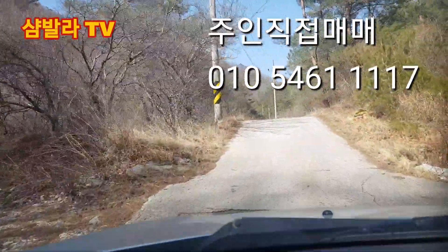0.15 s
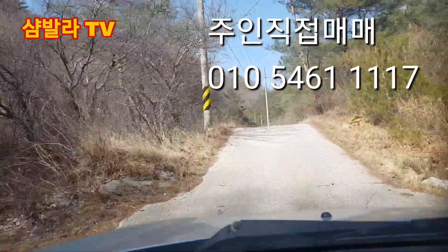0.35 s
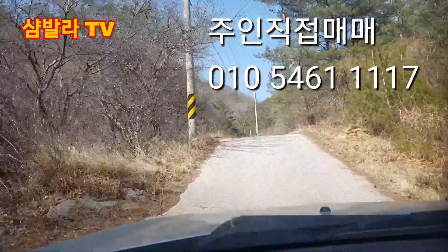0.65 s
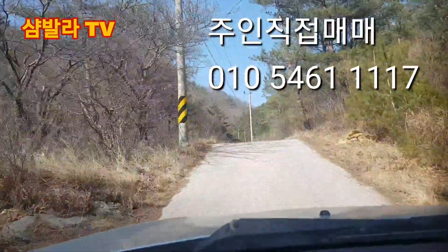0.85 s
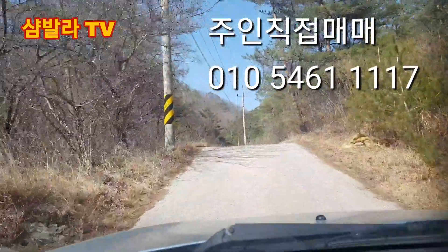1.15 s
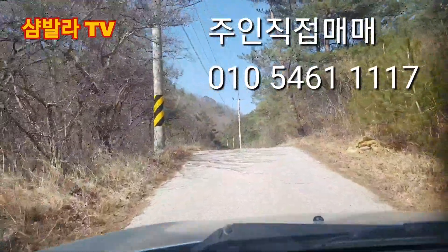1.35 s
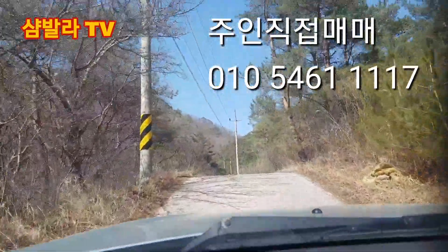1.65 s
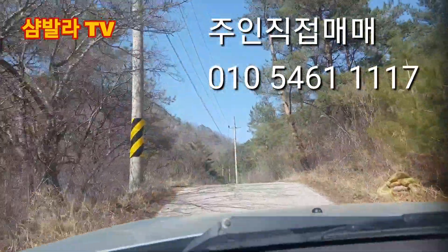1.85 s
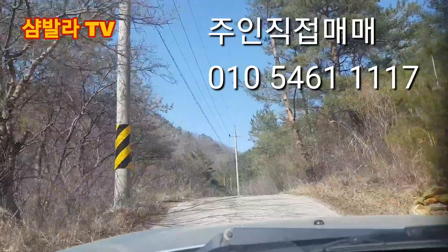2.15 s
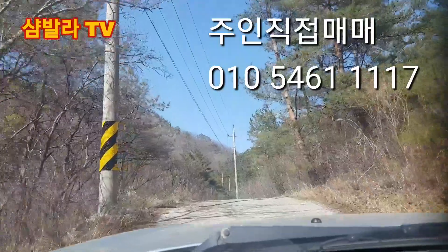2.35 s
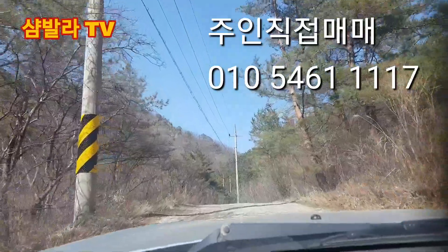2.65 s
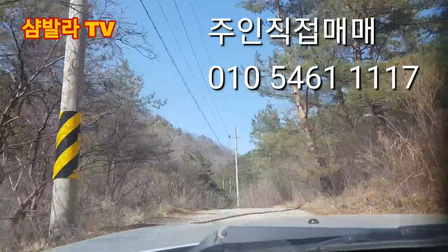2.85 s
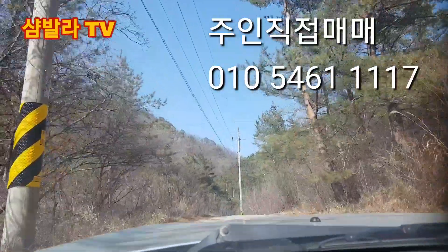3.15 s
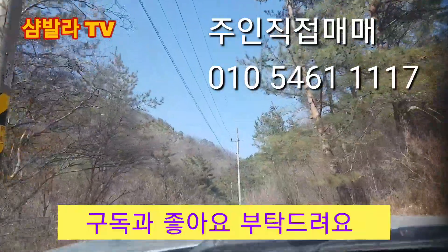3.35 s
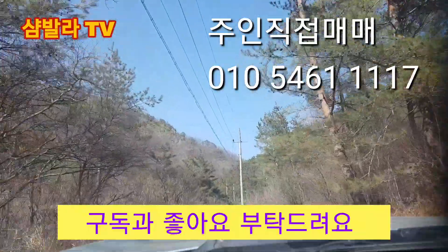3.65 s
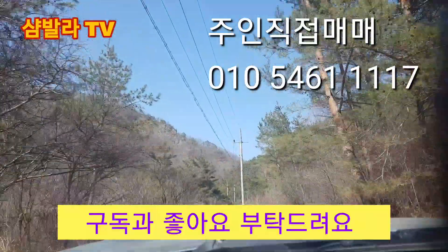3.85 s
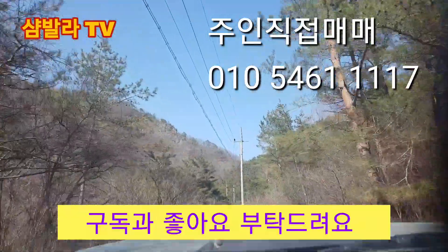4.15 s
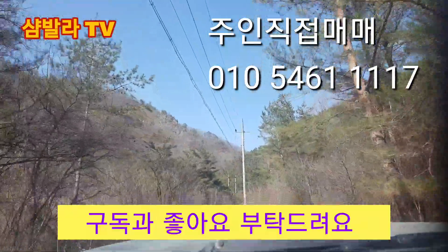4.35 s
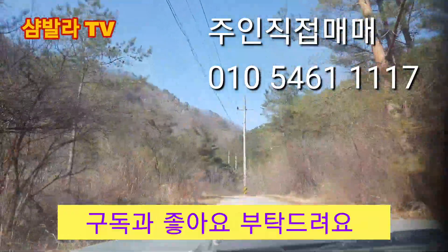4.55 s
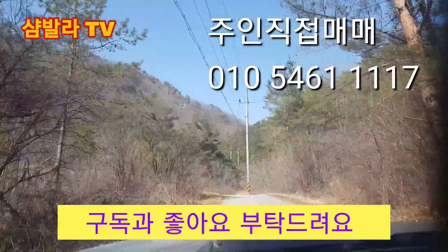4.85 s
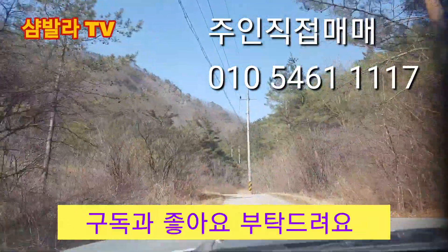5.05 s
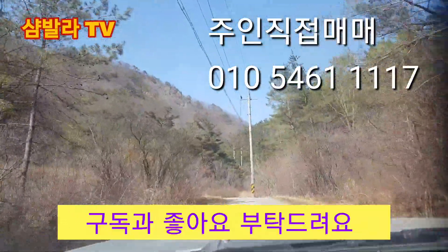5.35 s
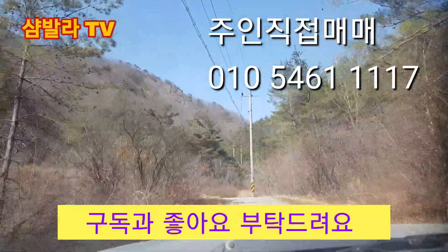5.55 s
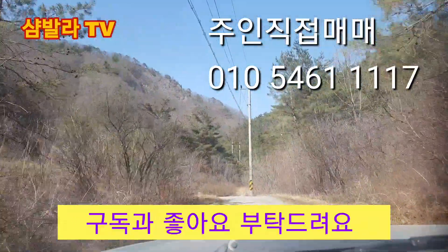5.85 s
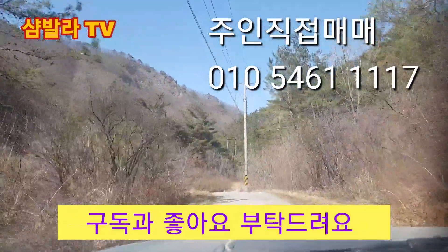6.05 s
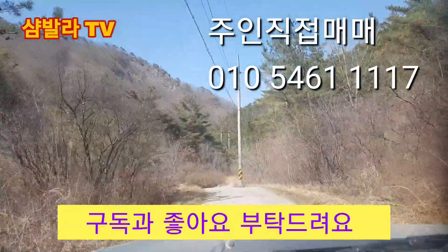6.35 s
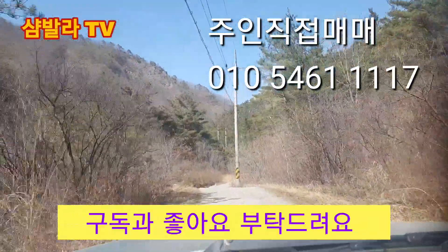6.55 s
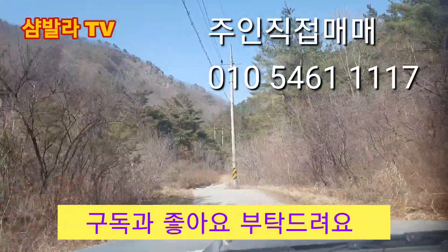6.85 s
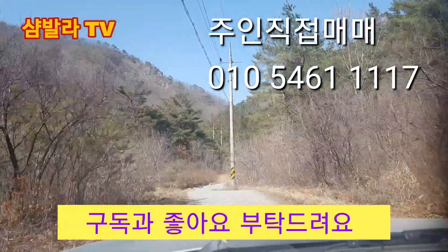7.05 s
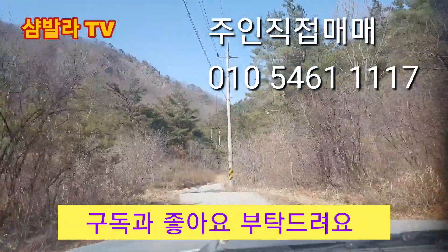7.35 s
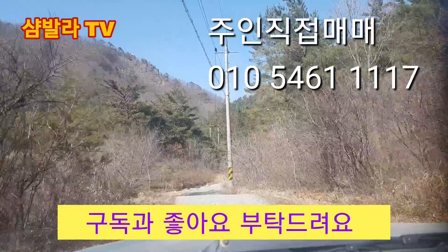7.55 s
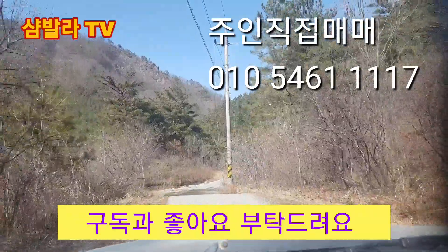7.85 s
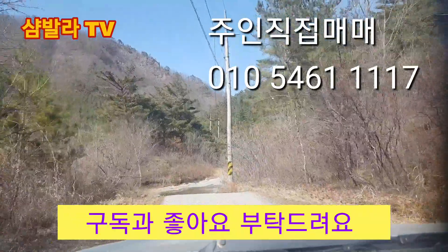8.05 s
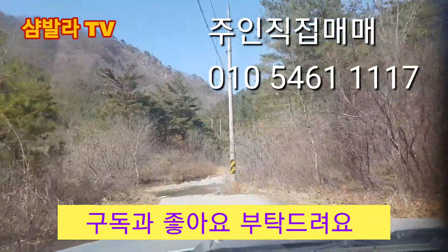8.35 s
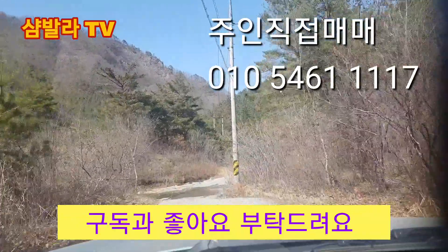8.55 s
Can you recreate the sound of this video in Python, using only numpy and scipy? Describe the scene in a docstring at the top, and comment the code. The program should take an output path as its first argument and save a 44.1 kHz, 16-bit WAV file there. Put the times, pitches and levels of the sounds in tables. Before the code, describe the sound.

Heard from a dashboard microphone inside a slowly moving car: a low engine drone and bassy tyre rumble run throughout. Early ruts boom while loose plastic chatters over fading hiss and crackling grit. A rubber bush groans briefly, the engine rises in pitch over a crest, then two heavy suspension thumps hit midway, followed by lighter knocks and continued rattling.

```python
"""A car creeps along a broken concrete lane, heard from the dashboard: an engine drone over rumbling tyres.
At first ruts boom in the cabin, a loose plastic fitting chatters, and a hiss and crackling grit soon fade.
A rubber bush groans once near 1.5 s; the engine then firms up over a crest, as its firing rate rises.
The hardest ruts thump near 4.6 s and again near 5.3 s; later come lighter knocks and more chatter.
The drone and ringing parts are sums of sine waves; the rumble, hiss, grit and cracks are shaped noise."""
import sys
import numpy as np
from scipy import signal
from scipy.fft import rfft, irfft, next_fast_len
from scipy.io import wavfile

SR = 44100
rng = np.random.default_rng(int(sys.argv[2]) if len(sys.argv) > 2 else 0)


def log_audio(samples):
    """Write samples as a 16-bit WAV file to the path given in sys.argv[1]."""
    # one column per channel
    frames = np.atleast_2d(samples).T
    # limit to full scale, then quantise
    limited = np.clip(frames, -1, 1)
    pcm = np.round(limited * 32767).astype(np.int16)
    wavfile.write(sys.argv[1], SR, pcm)


N = 383229
TIME = np.arange(N) / SR  # seconds

# The engine's course. Each row: time in seconds, firing rate in Hz, drone level in dB.
ENGINE_COURSE = [(0, 51, -30.5), (2.5, 57.5, -28), (2.85, 62.5, -30.5), (3.35, 66.3, -28),
                 (4.46, 64.9, -29), (5.1, 54, -33), (8.69, 55, -28)]
# Engine tones while pulling. Each row: multiple of the firing rate, relative level in dB.
ENGINE_ORDERS = [(1, 1.5), (2, -11), (3, -11.5), (3.25, -19), (5, -27), (5.5, -26.5), (7, -35.5),
                 (8, -31.5)]
# Road roughness between ruts. Each row: time in seconds, rumble in dB, shaking of the fitting in dB.
ROAD_ROUGHNESS = [(.3, -23.5, -39), (1.15, -22.5, -20.5), (1.7, -26.5, -37), (2.3, -27, -27.5),
                  (3.0, -28.5, -58), (4.4, -25.5, -39), (5.2, -25.5, -25), (7.85, -23.5, -32.5),
                  (8.05, -19, -26), (8.69, -22, -35.5)]
# Colour of the tyre rumble. Each row: frequency in Hz, relative level in dB per Hz.
RUMBLE_COLOUR = [(12, -41), (24, -6), (43, -1.5), (108, -2), (140, -13), (211, -16.5), (314, -27.5),
                 (350, -27), (520, -48.5), (1140, -88)]
# Colour of the tread on concrete. Each row: frequency in Hz, relative level in dB per Hz.
ROAR_COLOUR = [(200, -2), (340, 5.5), (420, -2), (560, -0.5), (720, -6.5), (6000, -36)]
# Strength of the hiss. Each row: time in seconds, level above 2260 Hz in dB.
HISS_LEVEL = [(.25, -43), (.55, -47.5), (1.2, -48.5), (1.35, -57), (2.7, -65), (4.1, -61.5), (4.6, -54.5),
              (4.85, -68.5), (7.1, -80), (7.36, -52.5), (7.6, -69.5), (8.15, -58.5), (8.69, -67)]
# Colour of the hiss. Each row: frequency in Hz, relative level in dB per Hz.
HISS_COLOUR = [(300, 14), (800, 4.5), (2750, 5.5), (3400, 1), (7800, -6), (11500, -0.5), (16000, -7.5)]
# How alike left and right are. Each row: frequency in Hz, likeness from -1 (opposite) to 1 (same).
LEFT_RIGHT_LIKENESS = [(100, 0.96), (250, 0.87), (550, 0.15), (1000, -0.48), (2000, -0.051), (4000, -0.087)]
# Wheels hitting ruts. Each row: start in seconds, cabin boom in dB, suspension knock in dB,
# sharpness of the edge in dB per octave.
RUT_JOLTS = [(0, -18, -24.5, -1.5), (0.245, -18, -21, -2), (1.371, -22, -16, -5), (1.435, -20, -19.5, 3),
             (2.065, -18.5, -23, -5.5), (2.118, -15.5, -23.5, 2), (2.686, -45, -24, 5),
             (4.576, -14, -4, -2), (4.6248, -12.5, -10.5, -4), (4.683, -23.5, -9, 1),
             (5.256, -15, -16.5, -4.5), (5.319, -16, -20, -5.5), (5.41, -15.5, -27, -7),
             (6.441, -40, -18, 6.5), (7.455, -44, -15, -3)]
# Boom tones of the cabin. Each row: frequency in Hz, relative level in dB, time to fall 60 dB in seconds.
CABIN_MODES = [(33, -13, 0.073), (53.55, 8.5, 0.37), (86.3, -8, 0.12)]
# Ringing tones of the suspension. Each row: frequency in Hz, relative level in dB,
# time to fall 60 dB in seconds.
SUSPENSION_MODES = [(96, 0, 0.17), (168.2, -2.5, 0.12), (243, -1.5, 0.097), (345, -9, 0.12),
                    (485, -15, 0.094)]
# The loose fitting strikes its seat. Each row: start in seconds, strength in dB.
FITTING_STRIKES = [(0.012, -30), (0.152, -29.5), (0.2658, -29.5), (0.300, -27.5), (0.3385, -29.5),
                   (0.528, -32), (0.5585, -29), (0.615, -33.5), (0.650, -27.5), (0.760, -35), (0.893, -36),
                   (0.9139, -31), (0.9717, -33), (1.069, -31), (1.0944, -29), (1.1395, -32), (1.1932, -33),
                   (1.2215, -29.5), (1.4418, -32), (1.495, -27), (1.5313, -31), (1.69, -37),
                   (2.1201, -27.5), (2.163, -35), (2.1858, -30.5), (2.2155, -30), (2.2597, -27.5),
                   (2.3019, -32), (2.4168, -37), (2.4612, -36.5), (2.7556, -44), (2.8005, -41),
                   (2.845, -39), (3.5982, -36), (3.7481, -39.5), (4.188, -37), (4.2356, -30), (4.2765, -32),
                   (4.3675, -38), (4.589, -22.5), (4.6194, -25), (4.660, -26), (4.6983, -28.5),
                   (4.7316, -26), (4.7687, -29), (4.931, -38), (5.0141, -33), (5.0602, -35.5),
                   (5.104, -31.5), (5.1352, -33.5), (5.1825, -40), (5.226, -47), (5.3302, -26),
                   (5.38, -27.5), (5.4221, -28.5), (5.4813, -32), (5.515, -33), (5.539, -32),
                   (5.5802, -35.5), (5.614, -43), (5.6768, -35.5), (5.7015, -33), (5.7796, -36.5),
                   (5.828, -41), (5.8698, -31.5), (6.021, -32.5), (6.0494, -33), (6.1147, -37),
                   (6.1554, -33), (6.1998, -32), (6.274, -46), (6.361, -44), (6.6094, -33.5),
                   (6.6423, -36.5), (6.6983, -34), (6.7905, -31), (6.9335, -36), (6.975, -32),
                   (7.136, -35.5), (7.1576, -33.5), (7.2265, -37.5), (7.248, -35), (7.3998, -28.5),
                   (7.4495, -29), (7.4919, -25.5), (7.5347, -29.5), (7.587, -37.5), (7.732, -31.5),
                   (7.762, -34.5), (7.8172, -33), (7.977, -28.5), (8.0138, -34.5), (8.0633, -31.5),
                   (8.1188, -27.5), (8.1646, -28.5), (8.2084, -31.5), (8.409, -39.5), (8.6355, -34)]
# Ringing tones of the fitting. Each row: frequency in Hz, relative level in dB,
# time to fall 60 dB in seconds.
FITTING_MODES = [(1253, -8.5, 0.034), (1747, -6, 0.044), (2030, 0, 0.032), (2090, -3.5, 0.046),
                 (2386, -9, 0.036)]
# Colour of the fitting's cracks. Each row: frequency in Hz, relative level in dB per Hz.
CRACK_COLOUR = [(800, 16.5), (1500, 9), (2800, 5.5), (4800, 5), (7500, -6), (12300, -5.5), (16000, -13)]
# Snaps of dashboard trim. Each row: start in seconds, level in dB, time to fall 60 dB in seconds.
TRIM_SNAPS = [(1.853, -41.5, 0.073), (2.186, -34, 0.046), (4.235, -33.5, 0.051), (4.619, -36, 0.3),
              (5.401, -30, 0.049), (5.449, -33, 0.023), (6.54, -38.5, 0.14), (6.727, -32.5, 0.12)]
# Colour of the trim snaps. Each row: frequency in Hz, relative level in dB per Hz.
TRIM_COLOUR = [(900, 5), (4000, -3), (7500, -7), (11500, -4), (16000, -13)]
# Colour of crunching grit, through the dashboard. Each row: frequency in Hz, relative level in dB per Hz.
GRIT_COLOUR = [(600, 3.5), (1250, 0.5), (2100, 3.5), (2700, -10), (9000, -19)]
# The groaning bush, pressed down and let go. Each row: time in seconds, slip rate in Hz, level in dB.
GROAN_COURSE = [(1.365, 108, -46), (1.42, 87.5, -19.5), (1.51, 75.5, -31), (1.58, 89.6, -28.5),
                (1.62, 88, -69)]
# Tones of the groan. Each row: multiple of the slip rate, relative level in dB.
GROAN_ORDERS = [(2, -1.5), (3, -2.5), (4, -9)]

PULL_HZ, PULL_DB_PER_HZ = 64.05, 0.6  # upper engine orders fade as the firing rate drops below this
SWAY_S, SWAY_DB = 0.068, 6.5  # time for the body's sway to peak; rise of the rumble at a sway of 1
FULL_JOLT_DB = -8.5  # the boom of a full jolt
EDGE_HZ = 15950  # upper band limit


def gain_of(db):
    """Turns decibels into a multiplier."""
    return 10 ** (np.asarray(db) / 20)


def evened(x):
    """Scales a sound to unit average strength."""
    return x / np.sqrt(np.mean(x ** 2) + 1e-20)


def read(points, hz):
    """Reads a spectrum joined by straight lines over log frequency."""
    f, value = np.transpose(points)
    return np.interp(np.log(hz + 1), np.log(f + 1), value)


def follow(rows):
    """Gives each column of a timed table a value at every sample."""
    s, *columns = np.transpose(rows)
    return [np.interp(TIME, s, c) for c in columns]


def add(mix, s, sound):
    """Lays a sound into the stereo mix at time s."""
    part = mix[:, max(round(s * SR), 0):][:, :sound.shape[1]]
    part += sound[:, :part.shape[1]]


def wander(rate_hz):
    """A random drift of unit strength, mostly slower than the given rate."""
    hz = np.fft.rfftfreq(N, 1 / SR)
    slowed = rfft(rng.standard_normal(N)) / (1 + (hz / rate_hz) ** 4)
    return evened(irfft(slowed, N))


def noise(colour, above_hz=0, count=N):
    """Stereo noise, alike on both sides in the bass, of unit level above a given frequency."""
    size = next_fast_len(count)
    hz = np.fft.rfftfreq(size, 1 / SR)
    shared, apart = rfft(rng.standard_normal((2, size))) * gain_of(read(colour, hz))
    same = np.clip(read(LEFT_RIGHT_LIKENESS, hz), -1, 1)
    opposite = np.array([[1], [-1]])
    spectrum = np.sqrt(1 + same) * shared + np.sqrt(1 - same) * apart * opposite
    level = np.std(irfft(spectrum * (hz >= above_hz), size))
    return irfft(spectrum, size)[:, :count] / level


def blow(t, rise, t60):
    """A quick rise, then an exponential fall that loses 60 dB in t60 seconds."""
    return (1 - np.exp(-t / rise)) * np.exp(-np.log(1000) * t / t60)


def engine(waver=0.0024):
    """Engine orders, each throbbing a little; the upper ones stand out while it pulls."""
    hz, level_db = follow(ENGINE_COURSE)
    turns = np.cumsum(hz * (1 + waver * wander(6.25))) / SR
    pull_db = PULL_DB_PER_HZ * (hz - PULL_HZ)
    orders = 0
    for k, db in ENGINE_ORDERS:
        order_db = db + (k > 2) * pull_db + 2 * wander(13)
        orders = orders + gain_of(order_db) * np.sin(2 * np.pi * (k * turns + rng.random()))
    return gain_of(level_db) * evened(orders)


def tyres(road_db, roar_db=-46, roar_share=0.22):
    """Rumble through the body and a higher tread roar, both growing on rougher ground."""
    rumble = noise(RUMBLE_COLOUR) * gain_of(road_db)
    rougher_db = roar_share * (road_db - road_db.mean())  # the roar grows less than the rumble
    roar = noise(ROAR_COLOUR) * gain_of(roar_db + rougher_db + .5 * wander(2.9))
    return rumble + roar


def swaying():
    """How hard the body sways, about 1 after a full jolt: each rut starts a swell that dies away."""
    sway = np.zeros(N)
    for s, boom_db, _, _ in RUT_JOLTS:
        age = np.maximum(TIME - s, 0) / SWAY_S
        sway += gain_of(boom_db - FULL_JOLT_DB) * age ** 2 * np.exp(2 * (1 - age))
    return sway


def jolts(boom_rise=0.0037, clunk_rise=0.0035, thud_db=-23, thud_hz=720, spread=0.67, detune=0.056):
    """Wheels roll into ruts: the cabin booms and the suspension rings, with a dull puff of tread noise."""
    t, out = np.arange(SR // 2) / SR, np.zeros((2, N))
    boom = 0
    for hz, db, t60 in CABIN_MODES:
        boom = boom - gain_of(db) * blow(t, boom_rise, t60) * np.sin(2 * np.pi * hz * t)
    hz, mode_db, t60 = np.transpose(SUSPENSION_MODES)
    height = hz / np.median(hz)
    cushion = 1 - np.exp(-t / clunk_rise)  # the tyre rounds off the edge
    puff = blow(t, clunk_rise, .15)
    dull = signal.butter(4, thud_hz, fs=SR, output="sos")
    for s, boom_db, knock_db, tilt_db in RUT_JOLTS:
        phase, lag, bend = rng.standard_normal((3, len(hz)))  # never quite alike
        swing = np.exp(2j * np.pi * np.outer(hz * (1 + detune * bend), t))
        modes = blow(t, clunk_rise, t60[:, None]) * swing
        # higher modes differ more between left and right
        angle = 2 * np.pi * phase + spread * height * np.array([lag, -lag]) / 2
        weights = gain_of(mode_db + tilt_db * np.log2(height)) * np.exp(1j * angle)
        ring = (weights @ modes).imag
        thud = gain_of(thud_db) * puff * signal.sosfilt(dull, noise(ROAR_COLOUR, count=len(t)))
        add(out, s, gain_of(boom_db) * boom + gain_of(knock_db) * cushion * (ring + thud))
    return out


def fitting(hits, ring_db, crack_db, tail_db=-24, crack_scatter_db=2, vary_db=2.2, right_db=2.0,
            spread=0.38, detune=0.02):
    """Each contact is a short crack and a ring of the plastic; some crack more than others."""
    t, rings, crack_power = np.arange(SR // 10) / SR, np.zeros((2, N)), np.zeros((2, N))
    hz, mode_db, t60 = np.transpose(FITTING_MODES)[:, :, None]
    modes = gain_of(mode_db) * blow(t, 0.0017, t60) * np.exp(2j * np.pi * hz * t)
    crack, tail = blow(t, .0009, .02), blow(t, .004, .08)
    burst = crack + gain_of(tail_db) * tail  # the windscreen and cabin add a tail
    for s, db in hits:
        size, phase, lag = rng.standard_normal((3, len(hz)))  # no two contacts land on the same spot
        angle = 2 * np.pi * phase + spread * np.array([lag, -lag]) / 2
        weights = gain_of(vary_db * size) * np.exp(1j * angle)
        bent = modes * np.exp(2j * np.pi * hz * t * detune * rng.standard_normal())
        add(rings, s, gain_of(db + ring_db) * (weights @ bent).imag)
        strength_db = db + crack_db + crack_scatter_db * rng.standard_normal()
        add(crack_power, s, (gain_of(strength_db) * burst[None]) ** 2)  # overlapping cracks add in power
    sides = gain_of([[-right_db], [right_db]])
    return rings * sides + np.sqrt(crack_power) * noise(CRACK_COLOUR)


def rebounds(hits, delay=0.0135, drop_db=-5, scatter_db=2, eager=1.0):
    """The fitting flies back to its other stop; after a light strike it barely gets there."""
    s, db = np.transpose(hits)
    late, size = rng.standard_normal((len(s), 2)).T
    light_db = np.minimum(db - np.median(db), 0)
    rebound_s = s + delay * (1 + late / 10)
    rebound_db = db + drop_db + eager * light_db + scatter_db * size
    return np.column_stack([rebound_s, rebound_db])


def chatter(shake_db, per_s=22, level_db=-9, bunch_db=3):
    """The fitting trembles in its seat: light contacts at random times, stronger when shaken more."""
    at = np.flatnonzero(rng.random(N) < per_s / SR)
    bunches = bunch_db * np.clip(wander(8), -2, 1)  # contacts strengthen and weaken in irregular bunches
    return np.column_stack([TIME, shake_db + level_db + bunches])[at]


def groan():
    """A rubber bush slips in uneven jerks: its pitch falls under load and rises on release."""
    hz, level_db = follow(GROAN_COURSE)
    turns = np.cumsum(hz * (1 + .03 * wander(60))) / SR
    jerks = gain_of(2.5 * wander(50))
    tone = 0
    for k, db in GROAN_ORDERS:
        tone = tone + gain_of(db) * np.sin(2 * np.pi * (k * turns + rng.random()))
    slipping = (TIME > GROAN_COURSE[0][0]) & (TIME < GROAN_COURSE[-1][0])
    return gain_of(level_db) * evened(tone * jerks) * slipping


def grit(sway, shake_db, per_s=170, loose_db=-4, jolt_db=-40.0, rough_db=-19, scatter_db=2.5):
    """Small stones crackle under the tread: many tiny noise bursts at random times."""
    stones = rng.random(N) < per_s / SR
    sizes = stones * gain_of(scatter_db * np.minimum(rng.exponential(1, N), 3))
    grain = blow(np.arange(SR // 20) / SR, .0008, .022)
    power = signal.oaconvolve(sizes ** 2, grain ** 2)[:N]
    crackle = evened(np.sqrt(abs(power)))
    hiss_db, = follow(HISS_LEVEL)
    loose = gain_of(hiss_db + loose_db)  # rises and falls along with the hiss
    crunch = gain_of(jolt_db) * sway  # stronger in the ruts
    clumps = gain_of(shake_db + rough_db) * np.clip(wander(10.5), 0, 2)  # soft clumps on rough ground
    return noise(GRIT_COLOUR) * crackle * np.linalg.norm([loose, crunch, clumps], axis=0)


def trim(left_db=0.0):
    """Dry, bright snaps as the dashboard flexes: noise with a very quick rise."""
    t, bursts = np.arange(SR // 5) / SR, np.zeros((2, N))
    for s, db, t60 in TRIM_SNAPS:
        add(bursts, s, gain_of(db) * blow(t, 0.00011, t60)[None])
    return bursts * noise(TRIM_COLOUR) * gain_of([[left_db], [-left_db]])


def hiss(left_db=0.5):
    """A broad airy noise, strong at first, then faint with a few brief swells."""
    level_db, = follow(HISS_LEVEL)
    flicker_db = .5 * wander(19.0)
    sides = gain_of([[left_db], [-left_db]])
    return noise(HISS_COLOUR, 2260) * gain_of(level_db + flicker_db) * sides


def scene():
    """Adds up everything as it reaches the dashboard."""
    road_db, shake_db = follow(ROAD_ROUGHNESS)
    sway = swaying()
    strikes = fitting(FITTING_STRIKES, ring_db=-4, crack_db=1)
    returns = fitting(rebounds(FITTING_STRIKES), ring_db=-6.5, crack_db=3.5)  # the far stop is harder
    # light contacts land all over the part
    trembling = fitting(chatter(shake_db), ring_db=-3.5, crack_db=-3, vary_db=4, detune=0.071)
    car = engine() + tyres(road_db + SWAY_DB * sway) + jolts() + groan() + grit(sway, shake_db)
    return car + strikes + returns + trembling + trim() + hiss()


def record(dry, low_hz=18):
    """The microphone drops the deepest bass; soft ends, then the upper band limit."""
    bass_cut = signal.butter(2, low_hz, "high", fs=SR, output="sos")
    thinned = signal.sosfilt(bass_cut, dry) * signal.windows.tukey(N, .001)
    band_limit = signal.firwin(511, EDGE_HZ, window=("kaiser", 9), fs=SR)
    return signal.oaconvolve(thinned, band_limit[None], "same")


dry = scene()
out = record(dry)
log_audio(out)
```